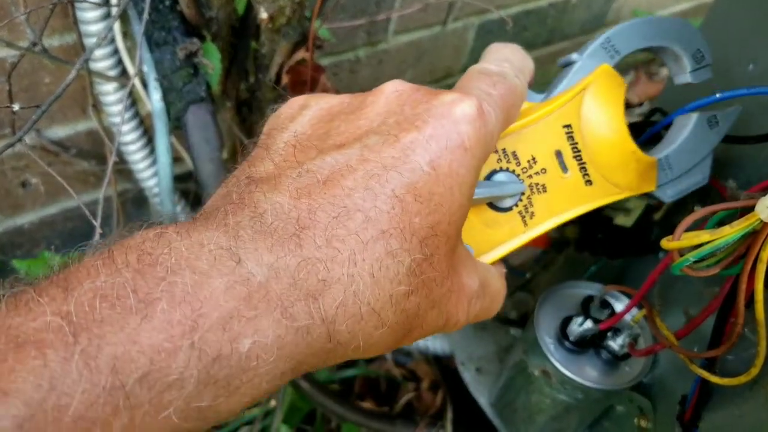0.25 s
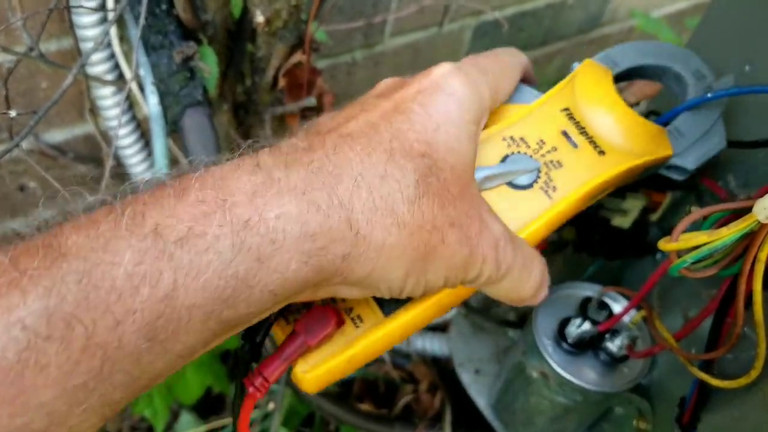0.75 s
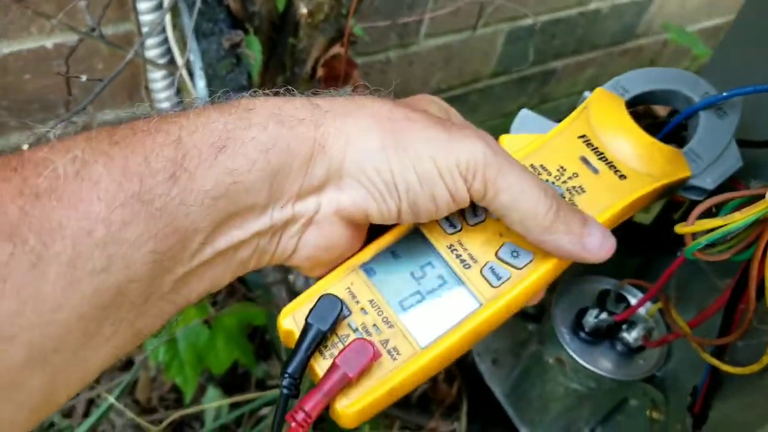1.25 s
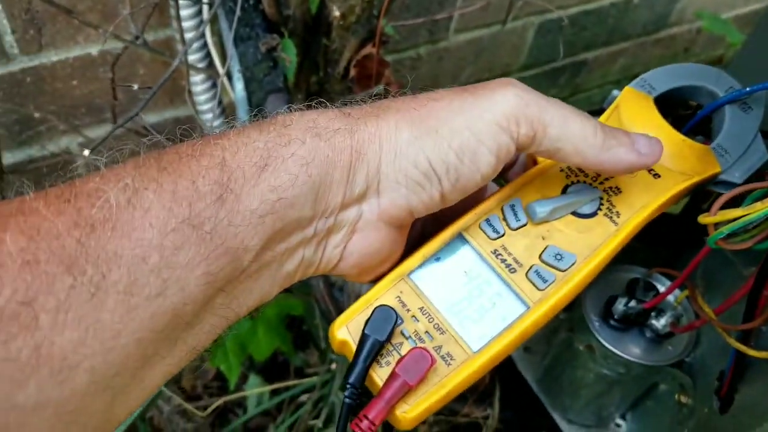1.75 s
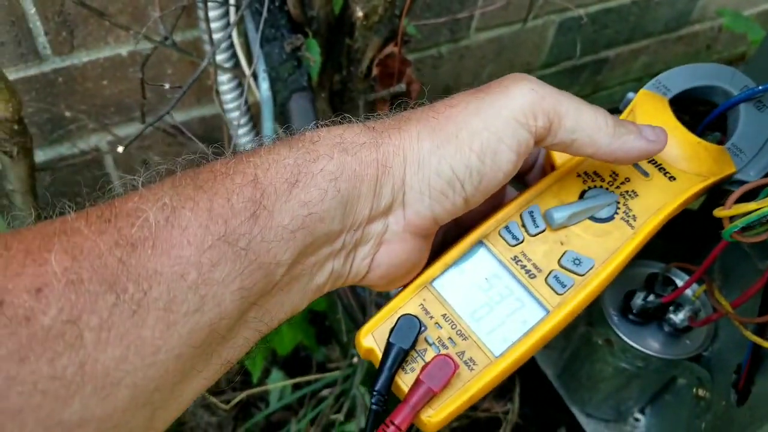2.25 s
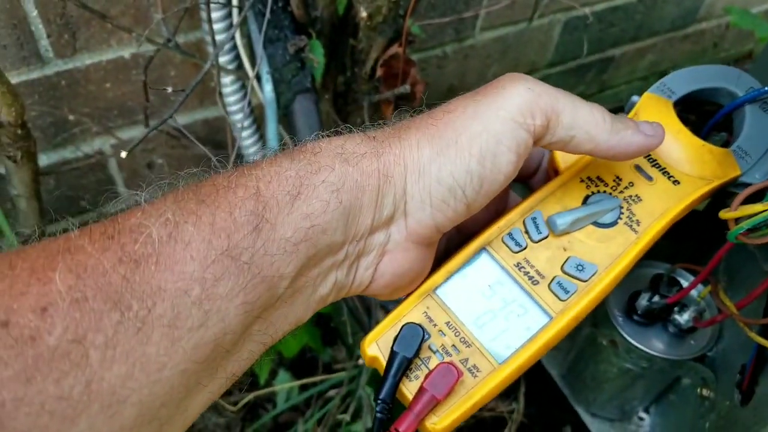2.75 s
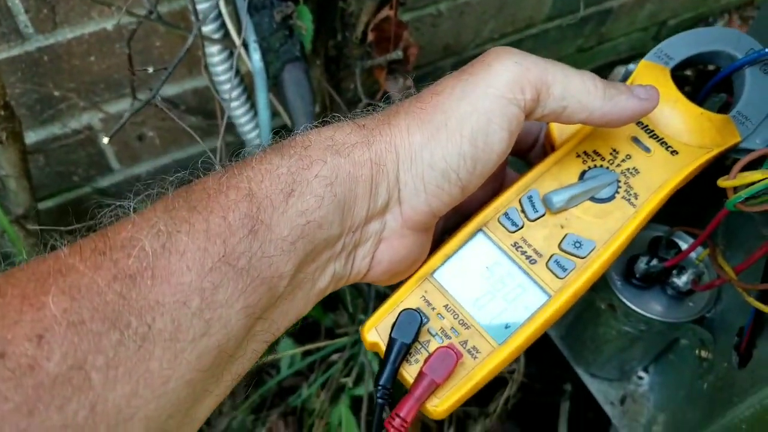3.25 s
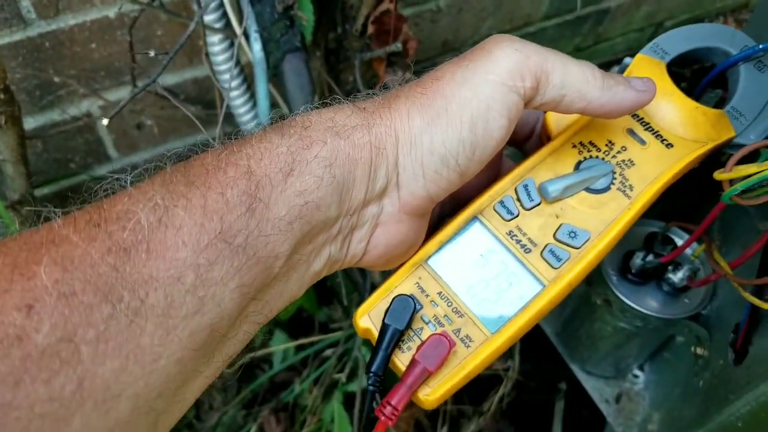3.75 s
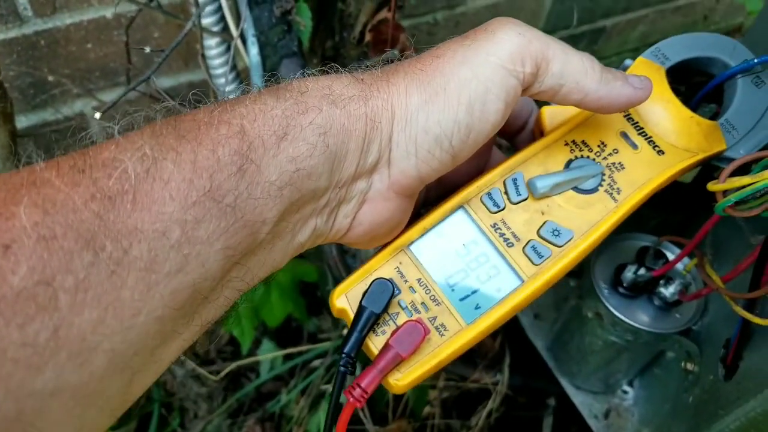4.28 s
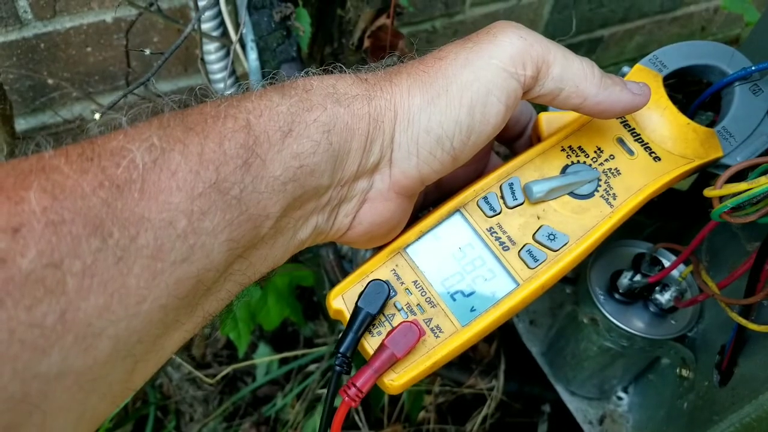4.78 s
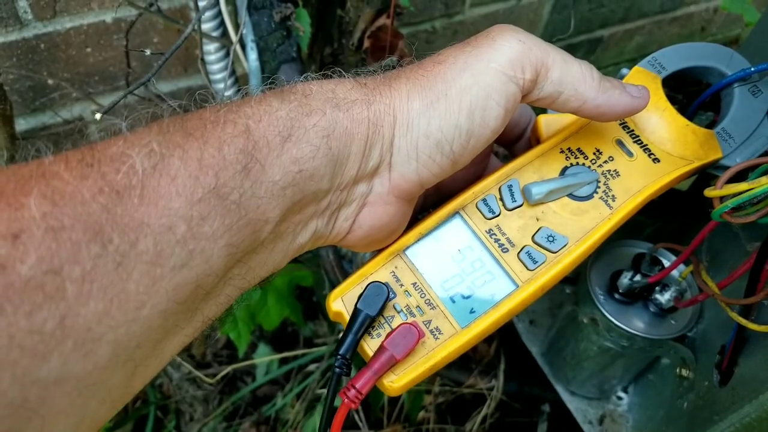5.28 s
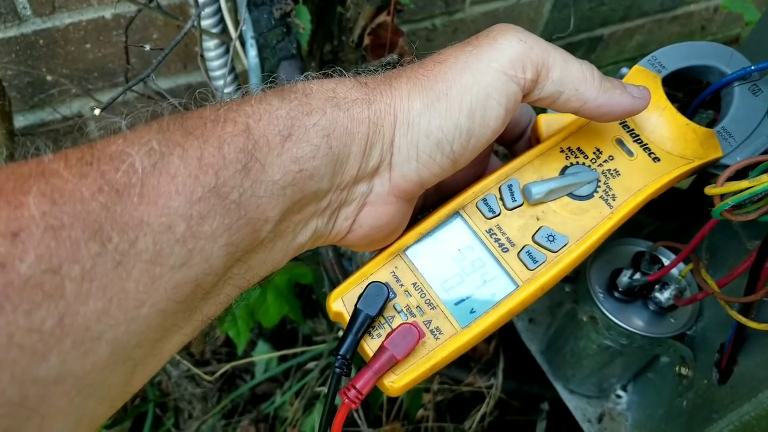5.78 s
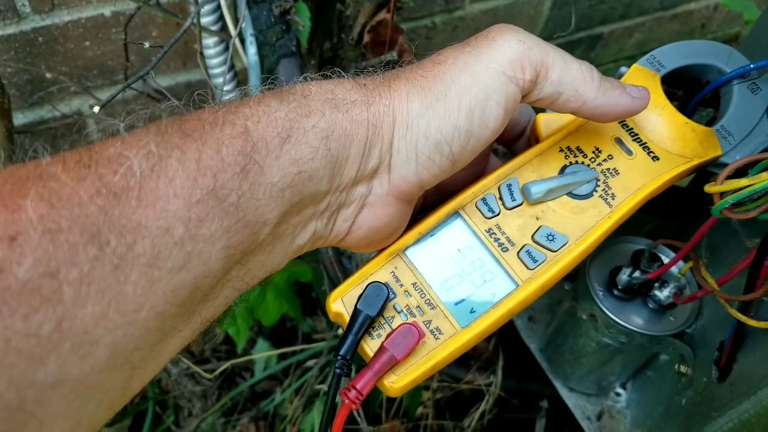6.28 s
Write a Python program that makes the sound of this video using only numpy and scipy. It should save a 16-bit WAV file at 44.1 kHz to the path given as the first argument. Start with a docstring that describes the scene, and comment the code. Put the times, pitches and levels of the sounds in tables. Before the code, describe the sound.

From 0 to about 6.5 seconds an outdoor air conditioner runs without a break, heard very close in stereo in the open air. The fan's deep drone, near 56 Hz, throbs about eighteen times a second, while its three uneven blades chop the broad rush of air into a rapid flutter. Dull, irregular flaps of air are thickest in the first 1.2 seconds, then sparser, with stronger ones near 6.1 and 6.3. A steady electrical hum at 120 Hz and above lies beneath a thin compressor buzz, ringing sheet metal and a faint whine near 2.3 kHz, which weakens around 1.5 and slowly returns. Bright hiss swells about three times a second. The roar's middle is fullest early, easing after 1.5 as the microphone edges out of the stream. Tiny plastic meter ticks fall near 1.3, twice, and fainter at 4.2.

```python
"""Outdoors, close to an air conditioner that runs steadily while the microphone edges out of its air stream.
Its three-bladed fan drones as a stack of sines, chops noise into a fluttering rush, flaps, slaps and scuffs.
The compressor adds a thin buzz, a faint whine and a noise hiss that swells about three times a second
as its rotor slips behind the mains. The casing rings and the motors hum at multiples of the mains rate.
A few faint ticks come from a hand-held meter."""
import sys
import numpy as np
from scipy import signal
from scipy.fft import rfft, irfft, next_fast_len
from scipy.io import wavfile
from scipy.ndimage import map_coordinates

SR = 44100
rng = np.random.default_rng(int(sys.argv[2]) if len(sys.argv) > 2 else 0)


def persist_wave(psi):
    """Save psi, clipped to +-1, as 16-bit WAV."""
    counts = np.round(np.clip(psi, -1, 1) * 32767).astype(np.int16)
    wavfile.write(sys.argv[1], SR, np.atleast_2d(counts).T)


N = 287811
FFT_SIZE = next_fast_len(N, True)
TIME = np.arange(N) / SR  # seconds
BINS = np.fft.rfftfreq(FFT_SIZE, 1 / SR)  # the frequency of each spectrum bin, Hz

# Mains rate, and turns per second of the two shafts.
MAINS_HZ, FAN_HZ, COMPRESSOR_HZ = 60.005, 18.531, 58.437


def amp(db):
    """Turns decibels into gain."""
    return 10 ** (np.asarray(db) / 20)


def read(points, hz):
    """Reads a spectrum table joined by straight lines on a log-frequency axis."""
    table_hz, value = np.transpose(points)
    return np.interp(np.log(hz + 1), np.log(table_hz + 1), value)


def over_time(points, times=TIME):
    """Reads a table of (seconds, value) joined by straight lines."""
    return np.interp(times, *np.transpose(points))


def balance(points):
    """Gains of the left and right port for each frequency, from left-minus-right dB."""
    return amp(np.array([[1], [-1]]) * read(points, BINS) / 2)


def pan(db):
    """Gains of the left and right port, from one left-minus-right dB."""
    return amp([[db / 2], [-db / 2]])


def colour(x, gain):
    """Filters x by a gain for each frequency."""
    return irfft(rfft(x, FFT_SIZE) * gain, FFT_SIZE)[..., :N]


def white():
    """Two unrelated noises of unit power per Hz."""
    return rng.standard_normal((2, N)) * np.sqrt(SR / 2)


def drift(rate_hz, size=8192):
    """Random wandering of rms 1, mostly slower than rate_hz."""
    knots = np.linspace(0, TIME[-1], size)
    smoothing = 1 / (1 + (np.fft.rfftfreq(size, knots[1]) / rate_hz) ** 4)
    x = irfft(rfft(rng.standard_normal(size)) * smoothing)
    return np.interp(TIME, knots, x / x.std())


def bell(hz, width_hz):
    """Gain of one resonance."""
    return 1 / (1 + 2j * (BINS - hz) / width_hz)


def tone(turns, db, pan_db, lag=0):
    """A sine of rms level db at both ports; the left one lags by lag radians."""
    angle = 2 * np.pi * turns
    left = amp(db + pan_db / 2) * np.cos(angle - lag)
    right = amp(db - pan_db / 2) * np.cos(angle)
    return np.sqrt(2) * np.array([left, right])


def swell_band(x, db, hz, width_hz):
    """Raises and lowers one band of x along the curve db."""
    band = colour(x, np.exp(-((BINS - hz) / width_hz) ** 2))
    return x + band * (amp(db) - 1)


def patchy(x, depth_db, width_hz, length_s, size=1024):
    """Lets x rise and sink in random patches of the given width and length."""
    hz, t, spectrum = signal.stft(x, SR, nperseg=size)
    places = np.meshgrid(hz / width_hz, t / length_s, indexing="ij")
    field = map_coordinates(rng.standard_normal((256, 1024)), places, mode="mirror")
    return signal.istft(spectrum * amp(depth_db * field), nperseg=size)[1][..., :N]


def shift(times=TIME):
    """How far the microphone has moved out of the air stream."""
    # Each row: time in seconds, share of the way (0-1).
    way = [(0, 0.56), (.5, 0.62), (1.2, 0.43), (2.0, 0.86), (3.4, 0.75), (4.6, 0.96), (6.53, 0.8)]
    return over_time(way, times)


def fan_air(turns, steady=0.67, gust_width=0.045, uneven_db=0.46):
    """Each blade throws a gust of turbulence; the air reaches the right port first."""
    # The unequal blades. Each row: place in the turn (0-1), relative strength of the gust.
    blades = [(0.149, 1.1), (0.457, 1.73), (.79, 0.99)]
    # Basic loudness of the air. Each row: frequency in Hz, level in dB per Hz.
    air_spectrum = [(15, -83), (31, -64), (52, -50), (130, -49), (220, -50), (275, -54.5), (325, -51.5),
                    (390, -52.5), (480, -56), (640, -62), (770, -60.5), (1000, -68), (1300, -77),
                    (2400, -79), (3400, -85.5), (5000, -86)]
    # Turbulence that comes with the blades. Each row: frequency in Hz, share (0-1).
    chopped_share = [(60, 0.25), (130, .45), (220, .62), (400, 0.78), (800, 0.6), (1500, 0.45), (3000, .45),
                     (5000, .2)]
    # Likeness of the air at the two ports. Each row: frequency in Hz, likeness (0-1).
    likeness = [(20, .3), (55, 0.86), (200, 0.92), (520, 0.92), (800, 0.85), (1100, 0.7), (1600, 0.56),
                (3000, 0.02)]
    # Delay of the air at the left port. Each row: frequency in Hz, delay in ms.
    left_delay = [(200, 0.32), (800, 0.21), (1500, 0.31), (4000, 0.354)]
    # Balance of the air. Each row: frequency in Hz, left minus right in dB.
    air_balance = [(60, -1), (190, -1), (300, -3), (540, -1), (720, -3.5), (1000, 2), (1230, -2.5),
                   (3000, -1)]
    gusts = 0
    for place, strength in blades:
        from_blade = (turns - place + 0.5) % 1 - 0.5
        gusts = gusts + strength * np.exp(-0.5 * (from_blade / gust_width) ** 2)
    chop = steady + gusts * amp(uneven_db * drift(2.5))
    chop /= np.sqrt(np.mean(chop ** 2))
    eddies = white()
    share = read(chopped_share, BINS)
    mixed = colour(eddies, 1 - share) + chop * colour(eddies, share)
    right, other = rfft(mixed, FFT_SIZE)
    same = read(likeness, BINS)
    left = same * right + np.sqrt(1 - same ** 2) * other
    left *= np.exp(-2j * np.pi * BINS * read(left_delay, BINS) / 1000)
    ports = np.array([left, right]) * balance(air_balance) * amp(read(air_spectrum, BINS))
    return irfft(ports, FFT_SIZE)[:, :N]


def fan_roar(air):
    """Three bands of the roar rise and sink as the microphone moves in the stream."""
    # Rumble near 180 Hz. Each row: time in seconds, change in dB.
    rumble = [(0, -.5), (1.25, -1.3), (1.6, .3), (2.4, 1), (2.8, 0), (3.5, 1.2), (4.6, -1), (6.53, -.7)]
    # Low roar near 400 Hz. Each row: time in seconds, change in dB.
    low_roar = [(0, -3), (1.4, 0), (2.3, 1), (3.4, -1), (5.2, 1), (5.6, 0.9), (6.1, 3), (6.53, -0.5)]
    # Roar near 800 Hz, fullest early on. Each row: time in seconds, change in dB.
    roar = [(0, -2), (.2, 3.5), (.45, 1.5), (.95, 2), (1.7, -2.5), (2.8, -2), (3.4, -1.3), (4.9, -3),
            (6.53, -4)]
    air = swell_band(air, over_time(rumble), hz=186, width_hz=110)
    air = swell_band(air, over_time(low_roar), hz=393, width_hz=180)
    return swell_band(air, over_time(roar), hz=815, width_hz=330)


def fan_buffets(air, length_s=0.0032, edge=0.19, calm=0.54, calm_s=0.0022, lag_ms=0.28, pan_db=-2):
    """Now and then one large eddy takes the place of the small ones: a dull flap of two or three cycles."""
    # The hardest buffets. Each row: time in seconds, level in dB, pitch in Hz.
    buffets = [(.077, -12.5, 393), (0.132, -17, 320), (0.185, -14, 414), (.296, -21.5, 520),
               (.514, -12.5, 342), (0.672, -15, 338), (.779, -11.5, 380), (.888, -12, 427),
               (1.03, -18, 453), (1.103, -13.5, 363), (1.536, -13.5, 358), (2.24, -13.5, 340),
               (2.345, -16, 355), (2.416, -18, 322), (2.615, -17, 520), (2.776, -17, 375),
               (2.829, -17, 485), (3.369, -14.5, 370), (4.072, -13.5, 340), (4.287, -13.5, 397),
               (4.831, -15, 346), (5.152, -14, 344), (6.072, -13.5, 350), (6.124, -11, 340),
               (6.336, -11, 355)]
    out = air.copy()
    for (moment, db, hz), start in zip(buffets, rng.random(len(buffets))):
        near = abs(TIME - moment) < 4 * calm_s
        t = TIME[near] - moment - np.array([[lag_ms / 1000], [0]])  # later on the left
        angle = 2 * np.pi * (hz * t + start)
        flap = (np.cos(angle) + edge * np.cos(2 * angle)) / np.cosh(2 * t / length_s)
        out[:, near] *= 1 - calm * np.exp(-(t / calm_s) ** 2)
        out[:, near] += flap * amp(db) * pan(pan_db)
    return out


def fan_drone(turns, place=0.5176, skew=0.26, pan_db=-1.0, lag=-0.45):
    """Blade passing gives the third order; one blade pushes harder, so the drone throbs once a turn."""
    # Drone before its slow changes. Each row: multiple of the shaft rate, level in dB.
    fan_orders = [(2, -39.5), (3, -24), (4, -34), (5, -41.5), (6, -37.3), (9, -39.8)]
    # Slow changes. Each row: time in seconds, change in dB.
    drone_change = [(0, .2), (.85, .8), (1.5, 0), (2.35, -1.3), (3.1, .1), (4.6, 1), (5.5, .1), (5.85, 1.2),
                    (6.53, .8)]
    drone = sum(tone(k * (turns - place) - skew, db, pan_db, lag) for k, db in fan_orders)
    return drone * amp(over_time(drone_change))


def blade_slaps(turns, place=0.1436, skew=0.23, pan_db=-1, lag=0.3):
    """Each blade passes the grille with the same short, dull push."""
    # Each row: multiple of the shaft rate, level in dB.
    slap_orders = [(12, -45), (15, -49), (18, -48), (21, -49.5), (24, -54)]
    return sum(tone(k * (turns - place) - skew, db, pan_db, lag) for k, db in slap_orders)


def fan_scuff(turns, depth=0.77, place=0.57, pan_db=-3):
    """A soft rasp that rises once every fan turn, never twice alike."""
    # Basic loudness of the scuffing. Each row: frequency in Hz, level in dB per Hz.
    scuff_spectrum = [(3500, -100), (5000, -84), (5850, -80.5), (6600, -91), (7200, -86.5), (9000, -100)]
    uneven = amp(1.3 * drift(13.5))
    stroke = (1 + depth * np.cos(2 * np.pi * (turns - place))) * uneven
    return colour(white(), amp(read(scuff_spectrum, BINS))) * stroke * pan(pan_db)


def compressor_buzz(wander=0.0024, even_db=0.5, left_db=-2, scatter_db=0.5, side_scatter_db=4,
                    fade_db=2.0, path_spread=0.16, count=128, size=4096):
    """A long stack of shaft orders; the high ones reach each port by many paths and waver."""
    # Basic level of most lines. Each row: frequency in Hz, level in dB.
    buzz_spectrum = [(400, -66), (780, -58), (1050, -69), (1400, -62.5), (1900, -63.5), (2550, -66.5),
                     (3200, -70), (3700, -72), (4400, -74), (5700, -69), (7200, -73), (8000, -77)]
    # Lines that the casing radiates best, before wavering.
    # Each row: multiple of the shaft rate, level in dB, left minus right in dB.
    ringing_orders = [(4, -41.5, -5), (6, -48, -4), (12, -56, -2), (14, -54, 2), (22, -61, -2),
                      (26, -51, -2), (30, -57, -1), (31, -60, 2), (48, -64.5, -4), (50, -63, -4),
                      (62, -68, -8), (68, -66, 0), (89, -66, -10), (97, -65, -2), (100, -64, -2),
                      (121, -66, -2)]
    # Typical delay at the left port, before and after the microphone moves, in ms.
    buzz_delay_ms = (.37, .31)
    orders = np.arange(count)
    hz = orders * COMPRESSOR_HZ
    strength, side, start, path = rng.standard_normal((4, count))
    # Even orders are raised and odd ones lowered by even_db.
    db = read(buzz_spectrum, hz) + even_db * (-1) ** orders + scatter_db * strength
    pan_db = left_db + side_scatter_db * side
    for k, level, side_db in ringing_orders:
        db[k], pan_db[k] = level, side_db
    moments = np.arange(0, TIME[-1] + 1, 0.5)
    fading_db = fade_db * np.minimum(hz / 2000, 1) * rng.standard_normal((2, len(moments), count))
    level_db = db + np.array([[pan_db], [-pan_db]]) / 2 + fading_db
    lines = amp(level_db) * np.exp(2j * np.pi * start) * (hz > 0)
    lag_ms = np.interp(shift(moments), [0, 1], buzz_delay_ms)
    lag_s = lag_ms[:, None] / 1000 * (1 + path_spread * path)
    lines[0] *= np.exp(-2j * np.pi * hz * lag_s)
    cycles = irfft(lines, size) * size / np.sqrt(2)  # one shaft turn for each port and moment
    turns = COMPRESSOR_HZ * TIME + wander * drift(1.0)
    # Play the turns round and round, blending from each moment into the next.
    places = [TIME / moments[1], turns % 1 * size]
    return np.array([map_coordinates(port, places, order=1, mode="grid-wrap") for port in cycles])


def compressor_hiss(crest=0.55, patchy_db=2.5, patch_hz=1200, patch_s=0.009, flutter=0.12, rasp=0.036):
    """Gas noise rasps with the motor, and swells as the rotor slips past the two poles of the mains field."""
    # Gas rushing through compressor and pipes, before it swells.
    # Each row: frequency in Hz, level in dB per Hz.
    hiss_spectrum = [(900, -86.5), (1700, -76.5), (2600, -76), (2950, -79), (3500, -83), (4500, -82),
                     (5800, -78), (6700, -80.5), (7600, -81), (10300, -85), (11500, -83.5), (12600, -80),
                     (13400, -76), (14400, -81.5)]
    # Balance of the hiss. Each row: frequency in Hz, left minus right in dB.
    hiss_balance = [(2000, -2.5), (6000, -3.5), (7600, 1.5), (10500, 0.5), (12500, -1.5), (14400, -1.5)]
    # How deeply the hiss swells with the slip. Each row: frequency in Hz, share (0-1).
    swell_depth = [(1000, 0), (2300, 0.15), (3700, 0.49), (5500, 0.32), (7500, 0.64), (11000, 0.7),
                   (14000, 0.5)]
    slip = 2 * (MAINS_HZ - COMPRESSOR_HZ) * TIME
    gas = colour(white(), amp(read(hiss_spectrum, BINS)) * balance(hiss_balance))
    gas = patchy(gas, patchy_db, patch_hz, patch_s, size=256)
    gas *= 1 + rasp * np.cos(2 * np.pi * 2 * MAINS_HZ * TIME)
    beat = np.cos(2 * np.pi * (slip - crest))
    surge = beat + flutter * (1 + beat) * drift(96)  # the flow is roughest at each crest
    return gas + colour(gas, read(swell_depth, BINS) / 2) * surge


def compressor_whine(order=40, pan_db=-4, waver_db=2.8, waver_hz=12, near_lag=-0.84, away_lag=2.85):
    """One shaft order sings out of the casing and wavers; its left lag grows as the microphone moves away."""
    # Whine before it wavers. Each row: time in seconds, level in dB.
    whine_level = [(0, -50.5), (.5, -53.5), (.75, -51), (.93, -54), (1.1, -51), (1.45, -61), (3.0, -58),
                   (3.6, -56), (4.6, -53.5), (6.53, -52.5)]
    level = over_time(whine_level) + waver_db * drift(waver_hz)
    turns = order * COMPRESSOR_HZ * TIME + 0.06 * drift(waver_hz)
    lag = near_lag + (away_lag - near_lag) * shift()  # radians
    return tone(turns, level, pan_db, lag)


def panels(rattle=0.81):
    """The sheet metal casing rings, shaken four times in each compressor turn."""
    # Resonances. Each row: frequency in Hz, width in Hz of one bell (two are multiplied),
    # basic level in dB per Hz, change in dB as the microphone moves all the way, left port's lag in radians.
    resonances = [(1085, 300, -84, 7, 3), (1570, 65, -71.5, 5, 3.5), (1800, 110, -93, 9, 5),
                  (2430, 170, -73, -8, 3), (4300, 74, -83, 10, 4.5), (4875, 160, -83.5, 5, -1),
                  (5830, 990, -70, -21.5, -0.3)]
    shake = white()[0] * (1 + rattle * np.cos(2 * np.pi * 4 * COMPRESSOR_HZ * TIME))
    moved = shift()
    out = np.zeros((2, N))
    for hz, width_hz, db, change_db, lag in resonances:
        ports = np.array([[np.exp(-1j * lag)], [1]])
        out += colour(shake, ports * bell(hz, width_hz) ** 2) * amp(db + change_db * moved)
    return out


def motor_hum(lag=1.0):
    """Magnetic hum at even multiples of the mains rate, and a cabinet tone just above; both rise and dip."""
    # Hum before its dips. Each row: multiple of the mains rate, level in dB, left minus right in dB.
    hum_orders = [(2, -30, 3), (6, -39.8, -3.5)]
    # The cabinet's tone before its dips: frequency in Hz, level in dB, left minus right in dB.
    cabinet_tone = (378.56, -37, -2)
    # Dips as the microphone moves through standing waves. Each row: time in seconds, change in dB.
    hum_change = [(0, 1.5), (.7, 1), (1.7, -0.5), (3.2, 0.5), (4.2, -1), (5.2, 0.6), (6.53, 2)]
    hz, db, pan_db = cabinet_tone
    hum = sum(tone(k * MAINS_HZ * TIME, level, side_db) for k, level, side_db in hum_orders)
    hum += tone(hz * TIME, db, pan_db, lag)
    return hum * amp(over_time(hum_change))


def mid_rush(x):
    """Two bands in the middle of the rush swell and sink."""
    # Rush near 1.1 kHz. Each row: time in seconds, change in dB.
    lower_band = [(0, 3), (.5, 0), (1.25, -1), (2.6, 0), (3.5, 1.2), (3.9, 1.5), (4.8, -.3), (5.6, .5),
                  (5.73, 4), (5.84, .5), (5.96, 4), (6.08, .5), (6.53, .5)]
    # Rush near 1.8 kHz. Each row: time in seconds, change in dB.
    upper_band = [(0, -3.5), (.7, 0.5), (1.03, -1.5), (1.3, 0.5), (1.9, 1.5), (2.75, 0.5), (3.2, 0),
                  (3.42, 6), (3.6, 2.5), (3.8, 1.5), (4.6, 1.5), (5.05, 0), (6.53, 0.5)]
    x = swell_band(x, over_time(lower_band), hz=1040, width_hz=270)
    return swell_band(x, over_time(upper_band), hz=1770, width_hz=280)


def meter_ticks(ring_hz=5950, width_hz=700, decay_s=0.012):
    """Small plastic clicks from the hand-held meter: ringing noise that starts at once and dies away."""
    # Each row: start in seconds, starting level in dB.
    ticks = [(1.269, -33.5), (1.32, -34), (4.187, -38)]
    ring = colour(white(), bell(ring_hz, width_hz) ** 2)
    blows = sum(amp(db) * (TIME >= start) * np.exp(-abs(TIME - start) / decay_s) for start, db in ticks)
    return ring / ring.std() * blows


def scene():
    """Fan and compressor in one cabinet, with loose clumps in the roar and in the rush above it."""
    # Clumps of the roar: depth in dB, width in Hz, length in seconds.
    roar_clumps = (1.4, 130, .07)
    # Clumps of the rush: depth in dB, width in Hz, length in seconds.
    rush_clumps = (1.5, 240, .06)
    turns = FAN_HZ * TIME + 0.006 * drift(1.0)  # the fan's speed wanders a little
    air = fan_buffets(patchy(fan_roar(fan_air(turns)), *roar_clumps))
    rush = fan_scuff(turns) + compressor_buzz() + compressor_hiss() + panels()
    rush = patchy(rush, *rush_clumps)
    fan_tones = fan_drone(turns) + blade_slaps(turns)
    return mid_rush(air + rush) + fan_tones + compressor_whine() + motor_hum() + meter_ticks()


def record(dry):
    """Each microphone port has a deep notch in the treble; then a low-pass filter sets the band limit."""
    # Left port, then right port. Each row: frequency in Hz, width in Hz, depth in dB.
    notches = [(8870, 720, -14.5), (8800, 760, -14)]
    notch_db = np.array([db * np.exp(-((BINS - hz) / width_hz) ** 2) for hz, width_hz, db in notches])
    heard = colour(dry, amp(notch_db))
    low_pass = signal.firwin(1023, 14600, window=("kaiser", 9), fs=SR)  # cutoff in Hz
    return signal.oaconvolve(heard, low_pass[None], "same")


dry = scene()
out = record(dry)
persist_wave(out)
```